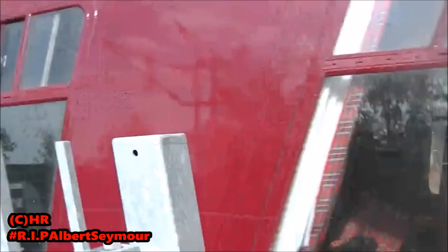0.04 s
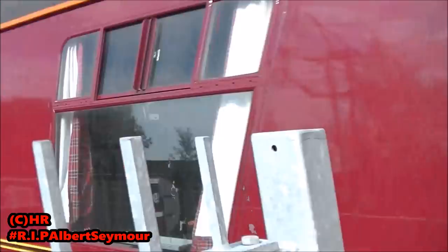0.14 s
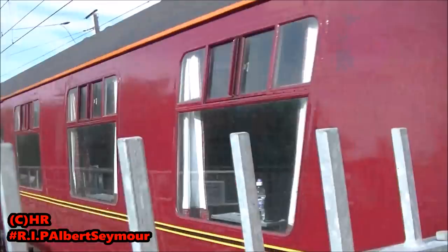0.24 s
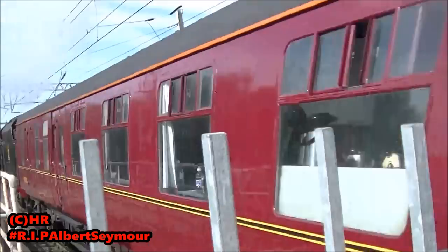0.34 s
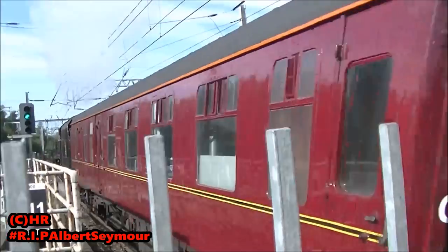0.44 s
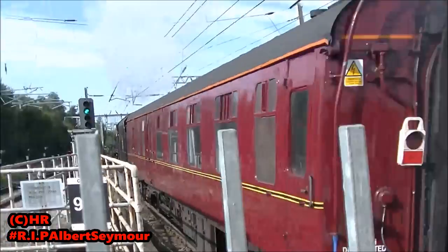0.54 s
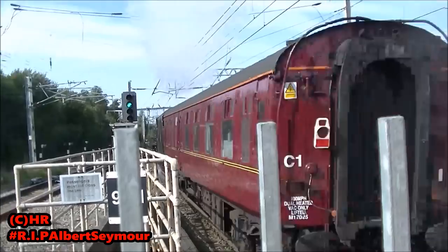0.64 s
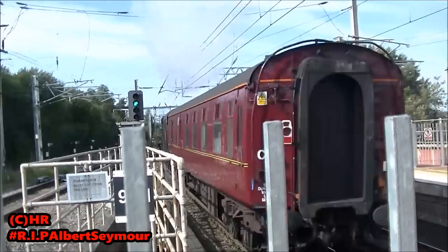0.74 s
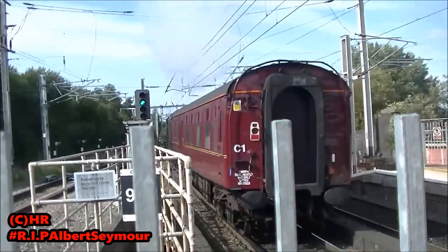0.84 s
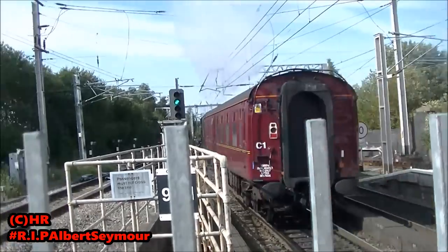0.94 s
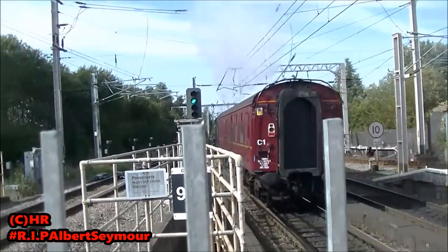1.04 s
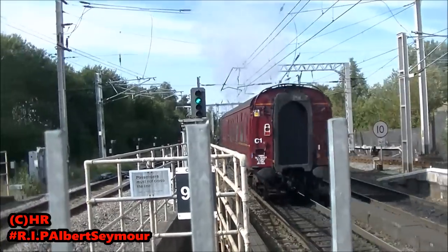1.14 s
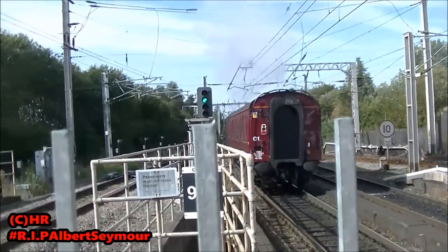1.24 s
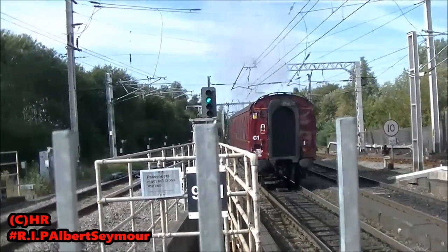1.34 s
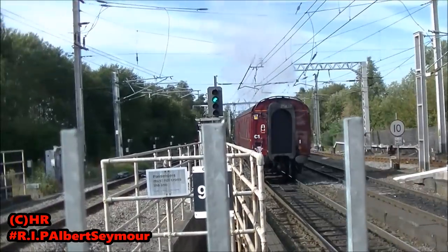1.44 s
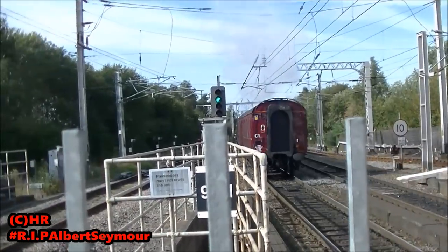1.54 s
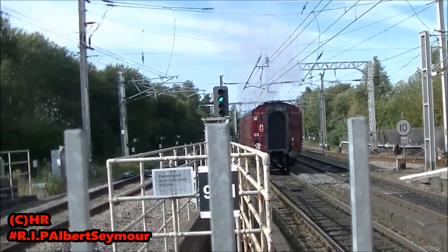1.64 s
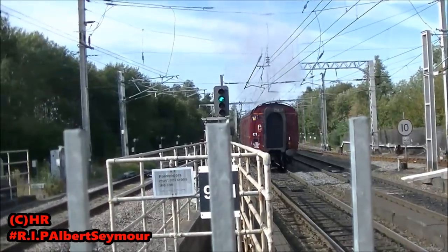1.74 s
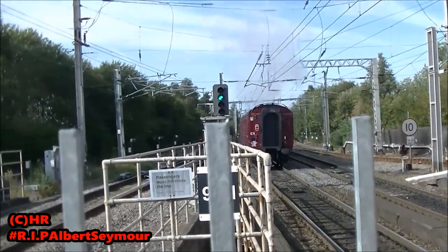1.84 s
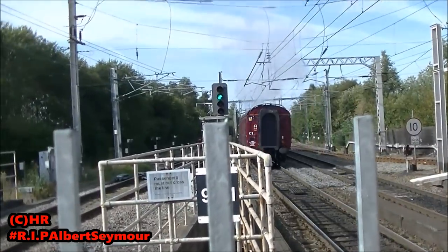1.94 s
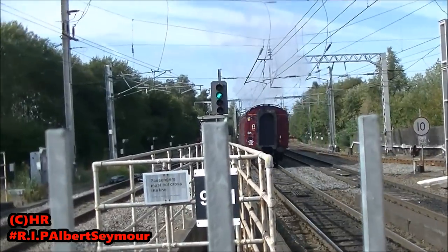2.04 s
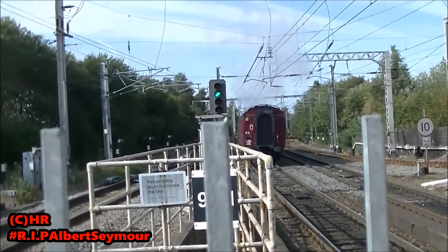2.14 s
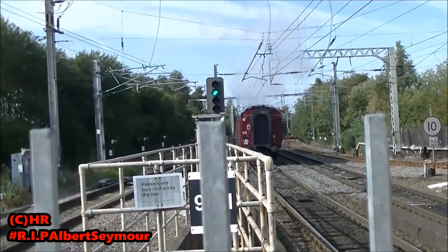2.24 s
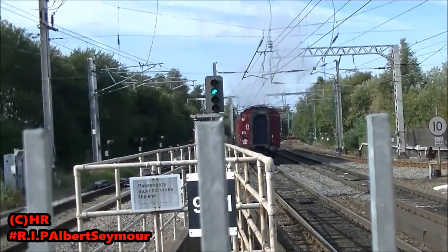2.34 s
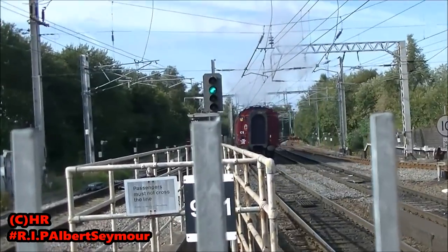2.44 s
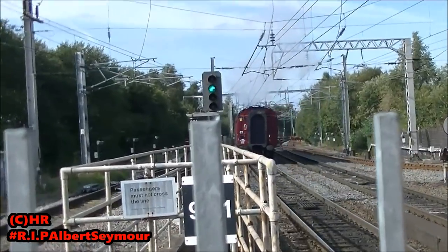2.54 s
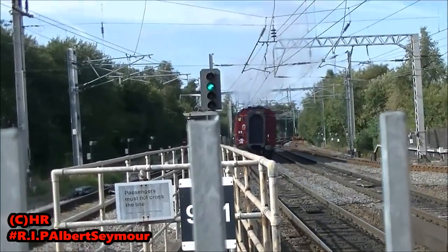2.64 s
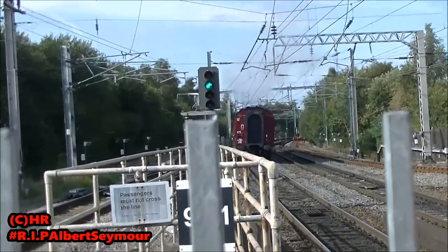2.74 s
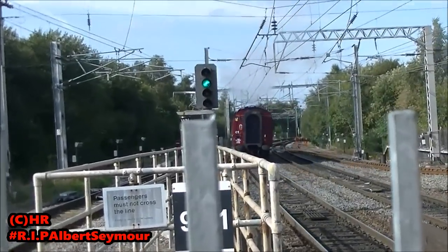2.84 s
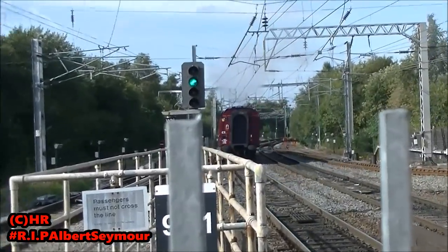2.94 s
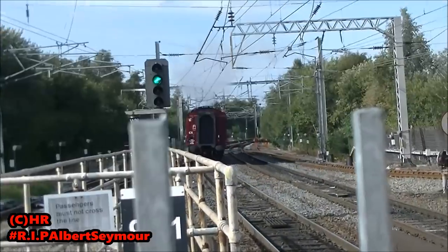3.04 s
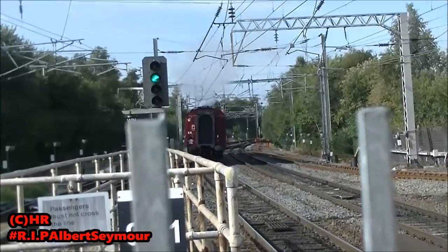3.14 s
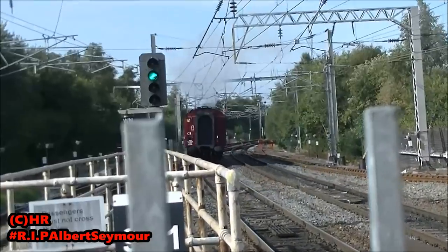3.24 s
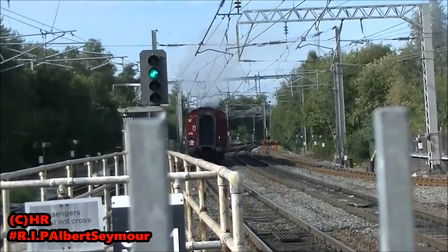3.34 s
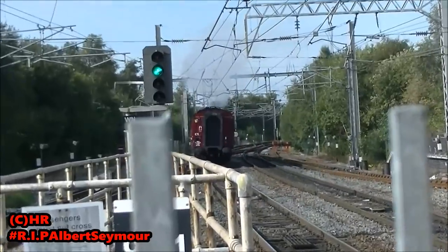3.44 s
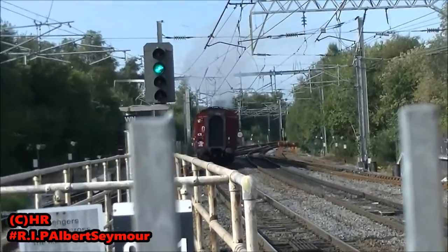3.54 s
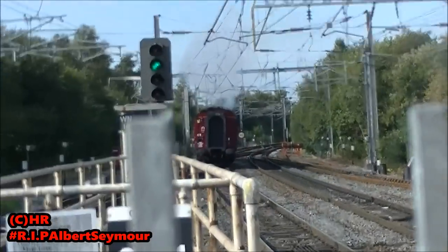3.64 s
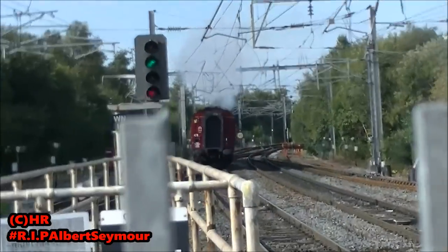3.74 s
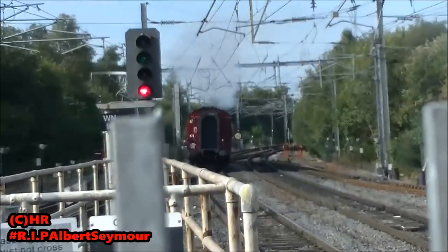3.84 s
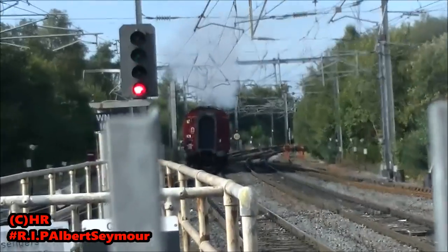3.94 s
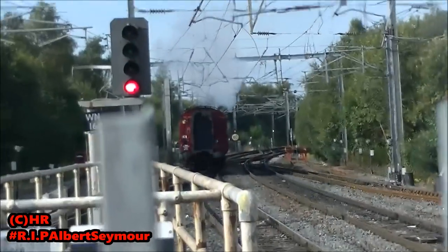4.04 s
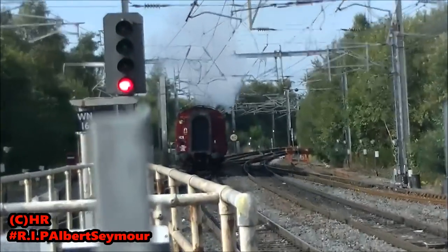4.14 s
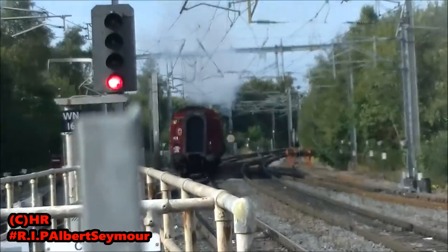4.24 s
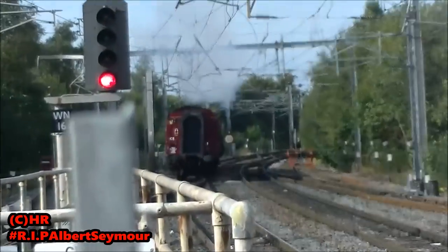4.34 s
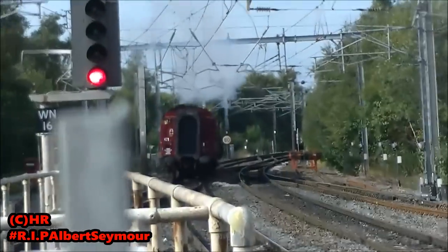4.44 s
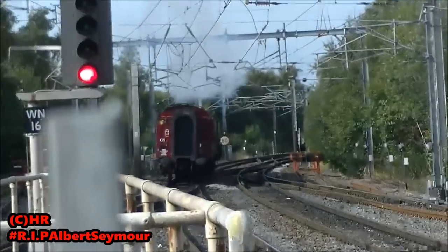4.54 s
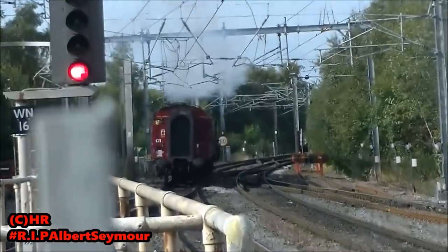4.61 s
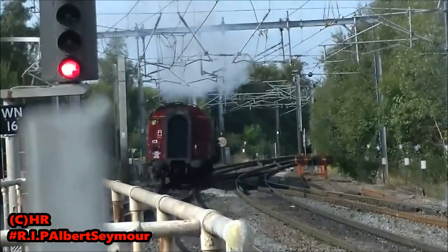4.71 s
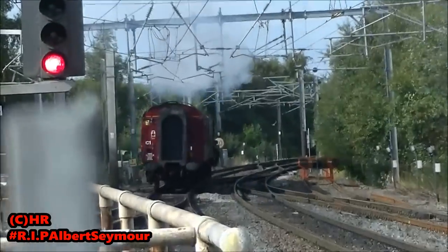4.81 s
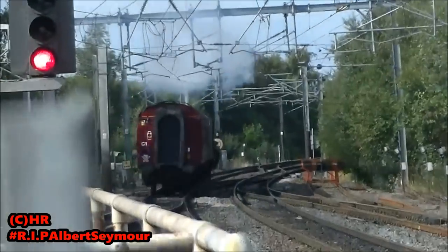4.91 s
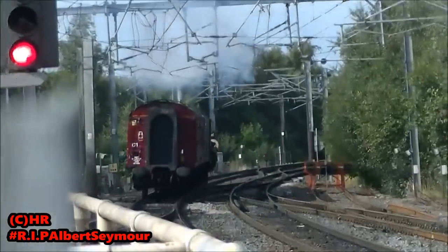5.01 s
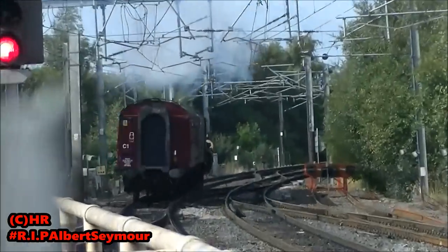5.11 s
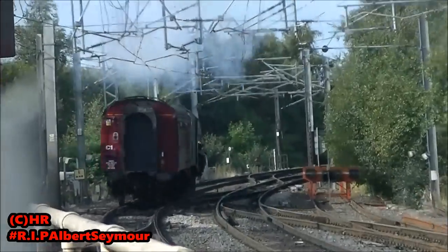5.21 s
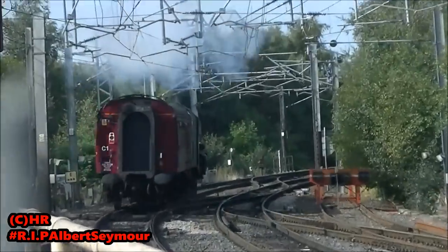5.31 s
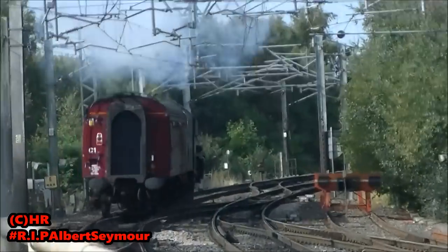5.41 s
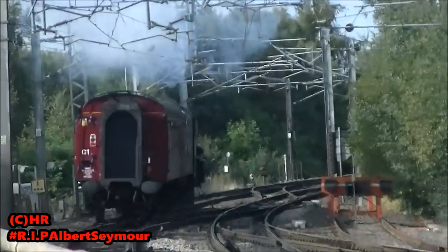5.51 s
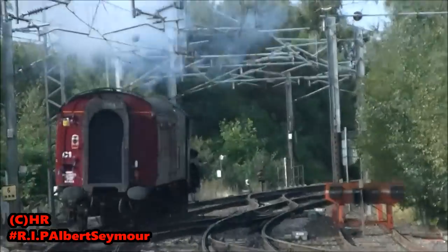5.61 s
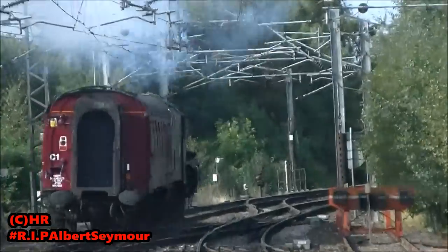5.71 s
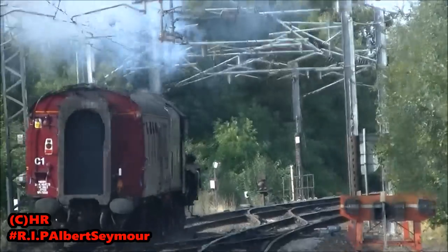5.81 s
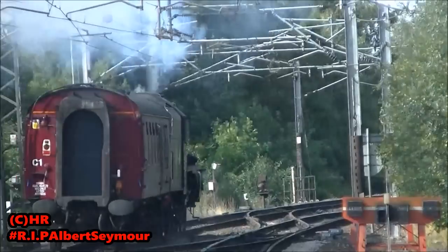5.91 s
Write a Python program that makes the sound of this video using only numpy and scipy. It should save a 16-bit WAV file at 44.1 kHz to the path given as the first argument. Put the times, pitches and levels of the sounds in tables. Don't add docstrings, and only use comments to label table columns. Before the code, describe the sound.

Last carriages of a train rush past close by and recede, wheels clacking over joints, with handling clicks and a thin late squeal.

```python
import sys
import numpy as np
from scipy import signal
from scipy.fft import rfft, irfft
from scipy.io import wavfile
from scipy.ndimage import uniform_filter1d

SR = 44100
rng = np.random.default_rng(int(sys.argv[2]) if len(sys.argv) > 2 else 0)


def log_audio(samples):
    frames = np.atleast_2d(samples).T
    limited = np.clip(frames, -1, 1)
    pcm = np.round(limited * 32767).astype(np.int16)
    wavfile.write(sys.argv[1], SR, pcm)


def makeup_ratio(level_db):
    decades = np.asarray(level_db, float) / 20
    return 10 ** decades


N = 263277

# (low [Hz], high [Hz])
LAYER_BANDS_HZ = [
    (250, 1500),
    (1500, 6000),
    (6000, 15000),
]
# (frequency [Hz], density [dB/Hz])
NEAR_COLOUR = [(250, -19), (330, -19), (450, -4.5), (595, -2.5), (770, -2.5), (1000, -3.5), (1170, -6),
               (1300, -2), (1580, -7), (1900, -5), (2100, -7.5), (2500, -3.5), (3200, -7.5), (4900, -9)]
# (frequency [Hz], density [dB/Hz])
FAR_COLOUR = [(250, -13), (450, -12), (600, -1.5), (710, -0.5), (870, -7.5), (1100, -8.5), (1300, -9),
              (1480, -13), (1750, -8.5), (2400, -12), (2800, -11.5), (3120, -17.5), (3500, -12),
              (4300, -14)]
# (time [s], far share [0-1])
FAR_SHARE = [(0, 0.35), (1.2, 0), (2, 0.57), (3, 0.72), (4, 0.97), (5.97, 0.84)]
# (time [s], level [dB])
TRAIN_LOUDNESS = [(0, -19.5), (.1, -19), (.5, -19), (.95, -18.5), (1.3, -20.5), (1.47, -20), (1.68, -23),
                  (1.87, -25), (2.4, -26.5), (2.9, -28.5), (3.2, -30), (3.4, -30.5), (3.8, -32),
                  (4.25, -33.5), (4.75, -33), (5.3, -33.5), (5.97, -30.5)]
# (level at loudest [dB], slope [dB/dB])
LAYER_LEVELS = [
    (-19, 1.0224),
    (-21.5, 0.8249),
    (-38.5, 1.32),
]
# (time [s], half length [s], rail [dB], wheel [dB], hiss [dB])
BOGIE_LIFTS = [(0.086, 0.092, 0.5, 0, 2.5), (0.25, 0.023, 0.5, -2, 0), (0.36, 0.27, -0.5, 3.5, 3),
               (.7, 0.17, 0.7, -1.1, -1), (1.252, 0.22, 0.4, 1, 1), (1.455, 0.039, -1.5, -2, -3.5),
               (1.52, 0.085, -0.3, -0.5, 0), (1.79, 0.049, 1.5, 1, 1), (2.1, 0.98, -0.4, 2, 2.5),
               (3.246, 0.19, 2, -0.8, -0.5), (3.618, 0.044, 1, 0.5, 1.5)]
# (frequency [Hz], gain [dB])
GRILLE_RESPONSE = [(100, -20), (160, -18), (230, 1), (300, 3), (5000, 1), (5700, -6.5), (6400, -7.5),
                   (7500, -14.5), (8600, -19.5), (9800, -14.5), (10600, -17.5), (12000, -27.5),
                   (13000, -32), (16000, -49)]
# (frequency [Hz], correlation [0-1])
PORT_LIKENESS = [(60, .5), (130, 0.55), (290, 0.79), (640, 1), (1400, 0.88), (3100, 0.96), (6800, 0.94),
                 (15000, 0.92)]
# (frequency [Hz], left minus right [dB])
PORT_LEAN_DB = [(130, -2.5), (290, -5), (640, -3.5), (1400, -2), (3100, -.5), (6800, 0.5), (15000, -.3)]
# (frequency [Hz], left lead [rad])
PORT_LEAD_RAD = [(200, 0.58), (1500, 0.31), (2700, 0.17), (3200, 0.48), (5600, 0.046), (6400, .01)]
# (time [s], factor on the lean)
CAMERA_SWING = [(0, 1.5), (.3, 1.23), (2, 1.23), (4, 1.28), (5.97, 0.51)]
# (time [s], length [s], frequency [Hz], slide [Hz/s], level [dB])
WHEEL_HUMS = [(.12, .1, 1430, -300, -25), (.24, .09, 1400, -250, -25), (.33, .17, 1335, -300, -21),
              (.78, .12, 1330, -500, -26), (1.15, .7, 1300, -15, -35), (.6, .22, 625, -200, -22),
              (.93, .12, 598, 10, -27), (1.2, .16, 600, -500, -25), (0, .14, 975, -300, -25),
              (1.38, .14, 600, -50, -26), (.29, .12, 2595, -640, -28), (5.22, .1, 1690, 20, -35),
              (4.42, .1, 1750, 10, -36), (0, .11, 1930, -300, -31), (.92, .07, 1400, 300, -27),
              (.22, .05, 700, -200, -26), (.45, .09, 720, -300, -25), (1.27, .06, 700, 200, -26),
              (2.58, .09, 560, 2500, -32), (2.762, .025, 700, 0, -23), (2.8, .08, 740, -500, -31),
              (3.17, .09, 780, -1400, -30)]
# (frequency [Hz], level [dB])
WIND_SPECTRUM = [(15, -50), (40, -34), (80, -16), (110, -9), (160, 1.5), (300, 6), (500, 5), (900, -18),
                 (8000, -25)]
# (time [s], peak [dB], rise [s], fall [s])
WIND_GUSTS = [(0, -40, .02, .05), (.28, -52, .08, .08), (.49, -34, .015, .11), (.68, -50, .05, .05),
              (1.35, -42, .06, .04), (1.57, -52, .03, .03), (1.83, -54, .05, .05), (2.05, -45, .04, .07),
              (2.33, -54, .05, .05), (2.6, -56, .1, .1), (2.88, -58, .05, .05), (3.2, -56, .03, .04)]
# (time [s], level [dB], length [s])
CASING_THUMPS = [
    (5.8363, -47, 0.0011),
    (3.5812, -61, .001),
    (.001, -44, .003),
    (2.907, -57, .001),
]
# (time [s], peak [dB], ring [Hz], second ring [Hz], length [s])
CASING_TICKS = [(.478, -30, 13500, 12000, .001), (.4865, -24, 12500, 10500, .0012),
                (.5362, -10, 8600, 10300, 0.0016), (1.313, -20, 9500, 12000, .001),
                (1.822, -16, 9800, 12500, .001), (2.077, -34, 15200, 14000, .001),
                (3.5813, -16, 9500, 7600, .0008), (3.637, -37, 12000, 14000, 0.0012),
                (3.562, -36, 10500, 9000, .002), (3.592, -39, 10500, 15000, .001),
                (5.677, -39, 10000, 8500, .001), (5.802, -40, 10500, 12000, .003),
                (5.881, -42, 13500, 12000, .001), (5.8338, -30, 4000, 3000, 0.0015),
                (5.8530, -15, 10000, 5300, .0016), (5.8885, -26, 9500, 1900, .0013),
                (5.9657, -17, 6000, 2600, 0.003)]
# (time [s], peak [dB], ring [Hz], second ring [Hz], length [s])
HARD_SNAPS = [
    (2.9071, 1, 6400, 4300, .00085),
    (2.9075, -7, 9400, 3100, .0007),
    (2.9081, -7, 4700, 5600, .0011),
    (5.8364, 1, 5600, 4700, .0006),
    (5.8375, -8, 4200, 2500, .001),
]
# (frequency [Hz], level [dB])
SNAP_SPECTRUM = [(1000, -46), (2500, -7.5), (4500, -11), (6500, -14), (10000, -10.5), (13000, -31),
                 (16000, -35)]
# (time [s], peak [dB])
JOINT_CLACKS = [(0.949, -5.5), (1.2076, -17), (1.491, -6.5), (1.7552, -6), (2.0347, -5.5), (2.3033, -6),
                (2.5705, -9), (2.8444, -25), (3.111, -14.5), (3.56, -15.5), (3.662, -19), (3.9404, -22),
                (4.2894, -22), (4.561, -18), (5.016, -15), (5.285, -17)]
# (frequency [Hz], level [dB])
CLACK_SPECTRUM = [(500, -38), (1500, -6), (2500, 5.5), (3300, -9), (4300, 4), (5200, 4.5), (7000, -21),
                  (12000, -35), (16000, -60)]
# (time [s], length [s], frequency [Hz], width [Hz], level [dB])
FINGER_BRUSHES = [
    (1.555, .06, 10500, 4000, -40),
    (1.342, .012, 12500, 6000, -49),
    (2.17, .015, 12500, 3000, -58),
    (3.2, .03, 11500, 2000, -61),
]
# (time [s], length [s], frequency [Hz], level [dB])
FLANGE_SQUEALS = [(4.655, .09, 4895, -37), (4.735, .19, 4893, -38.5), (4.93, .14, 4896, -40),
                  (5.115, .095, 4895, -39), (5.21, .13, 4893, -38), (5.33, .14, 4880, -41.5),
                  (5.46, .18, 4882, -38), (5.635, .05, 4885, -34.5), (5.725, .08, 4892, -37),
                  (5.84, .13, 4875, -42), (4.645, .13, 5258, -43), (4.76, .14, 5263, -43),
                  (4.92, .17, 5266, -41), (5.07, .15, 5262, -42), (5.25, .13, 5264, -43),
                  (5.39, .09, 5264, -49), (5.52, .11, 5275, -50), (4.87, .22, 4785, -45),
                  (5.675, .15, 4757, -39), (5.85, .12, 4755, -36.5)]
# (time [s], length [s], frequency [Hz], slide [Hz/s], level [dB])
SQUEAL_CHIRP = [
    (4.405, .1, 6575, 600, -53),
    (4.48, .14, 6640, 150, -51.5),
    (4.6, .07, 6660, -100, -62),
]
# (time [s], length [s], frequency [Hz], slide [Hz/s], level [dB])
MODE_SINGING = [
    (4.62, 1.35, 4897, -12, -48.5),
    (4.62, .85, 5260, 8, -52),
    (5.66, .31, 4770, -60, -49),
]
# (time [s], gain [dB])
HISS_LIFT = [(0, 0), (4.2, .5), (5.97, 4)]
# (time [s], depth [dB], onset [s], recovery [s])
GAIN_DUCKS = [
    (.48, 4, 0.023, 0.05),
    (1.35, 6, 0.0068, 0.03),
    (1.825, 1, 0.014, 0.11),
    (2.908, 4.5, 0.00069, 0.04),
    (5.838, 1, .002, 0.028),
]

LOUDEST_DB = -19
RUMBLE_DB, SELF_NOISE_DB = -61, -73.5
CALM_DB, CALM_DB_PER_S = -57, -4.5
CLACK_T60_S = 0.095
SECOND_DB, SECOND_DB_PER_OCTAVE = -12.5, -10


def evened(x):
    return x / np.sqrt(np.mean(x ** 2) + 1e-20)


def read(points, hz):
    f, value = np.transpose(points)
    return np.interp(np.log(hz + 1), np.log(f + 1), value)


def follow(rows, t):
    s, value = np.transpose(rows)
    return np.interp(t, s, value)


def add(mix, s, sound):
    part = mix[..., round(s * SR):][..., :sound.shape[-1]]
    part += sound[..., :part.shape[-1]]


def resonate(x, hz, width_hz):
    turn = np.exp(2j * np.pi * np.cumsum(hz * np.ones(len(x))) / SR)
    r = np.exp(-np.pi * width_hz / SR)
    return 2 * (turn * signal.lfilter([1 - r], [1, -r], x / turn)).real


def resonate_twice(x, hz, width_hz):
    return resonate(resonate(x, hz, width_hz), hz, width_hz)


def coloured(points, size):
    spectrum = rfft(rng.standard_normal(size))
    return evened(irfft(spectrum * makeup_ratio(read(points, np.fft.rfftfreq(size, 1 / SR))), size))


def drift(shape, bins, frames):
    field = uniform_filter1d(rng.standard_normal(shape), size=bins, axis=0)
    return evened(uniform_filter1d(field, size=frames, axis=1))


def tones(rows, width_hz, clean, edges):
    out = np.zeros((2, N))
    for s, length_s, start_hz, slide, db in rows:
        noise = rng.standard_normal((2, SR))[:, :round(length_s * SR)]
        hz = start_hz + slide * np.arange(noise.shape[1]) / SR
        fuzz = np.array([evened(resonate_twice(n, hz, width_hz)) for n in noise])
        quadrature = np.array([[0], [np.pi / 2]])
        steady = np.sqrt(2) * np.sin(2 * np.pi * np.cumsum(hz) / SR + quadrature)
        sound = np.sqrt(clean) * steady + np.sqrt(1 - clean) * fuzz
        add(out, s, sound * makeup_ratio(db) * signal.windows.tukey(len(hz), edges))
    return out


def layers_db(t):
    fall_db = follow(TRAIN_LOUDNESS, t) - LOUDEST_DB
    level_db = np.array([db + slope * fall_db for db, slope in LAYER_LEVELS])
    for s, half_s, *lift_db in BOGIE_LIFTS:
        level_db += np.exp(-((t - s) / half_s) ** 2) * np.array(lift_db)[:, None]
    return level_db


def rolling(patchy_db=0.75, flicker_db=0.81, ringing_db=1.39):
    hz, t, z = signal.stft(rng.standard_normal((2, N)), SR, nperseg=1024, noverlap=768)
    far = follow(FAR_SHARE, t)
    colour_db = (1 - far) * read(NEAR_COLOUR, hz)[:, None] + far * read(FAR_COLOUR, hz)[:, None]
    colour = makeup_ratio(colour_db + read(GRILLE_RESPONSE, hz)[:, None])
    patches = drift(colour.shape, bins=10, frames=12)
    rings = drift(colour.shape, bins=2, frames=24)
    flicker = evened(uniform_filter1d(rng.standard_normal(len(t)), size=6))
    place = np.interp(np.log(hz + 1), np.log([1200, 1900, 5200, 7200]), [0, 1, 1, 2])[:, None]
    gain_db = 0
    for k, (db, (low_hz, high_hz)) in enumerate(zip(layers_db(t), LAYER_BANDS_HZ)):
        band = colour[(hz > low_hz) & (hz < high_hz)]
        band_db = 10 * np.log10((band ** 2).sum(0) / len(hz))
        gain_db = gain_db + np.maximum(1 - abs(place - k), 0) * (db - band_db)
    rough_db = patchy_db * patches + ringing_db * rings + flicker_db * flicker * np.minimum(place, 1)
    z = z * colour * makeup_ratio(gain_db + rough_db)
    return signal.istft(z, SR, nperseg=1024, noverlap=768)[1][:, :N]


def hums():
    return makeup_ratio(-1.5) * tones(WHEEL_HUMS, width_hz=40, clean=.75, edges=.8)


def rumble():
    level_db = RUMBLE_DB + 0.82 * follow(TRAIN_LOUDNESS, np.arange(N) / SR)
    return makeup_ratio(level_db) * coloured([(10, 0), (90, -1), (200, -20), (400, -60)], size=N)


def self_noise():
    colour = [(3000, -30), (8000, -4), (12000, 0.5), (15500, 5), (16500, -20)]
    return makeup_ratio(SELF_NOISE_DB + follow(HISS_LIFT, np.arange(N) / SR)) * coloured(colour, size=N)


def wind(lumpy_db=-2.0, shared=0.27):
    t = np.arange(N) / SR
    lumps = np.array([evened(uniform_filter1d(n, size=1500)) for n in rng.standard_normal((2, N))])
    air = np.array([coloured(WIND_SPECTRUM, size=N), coloured(WIND_SPECTRUM, size=N)])
    blow = makeup_ratio(CALM_DB + CALM_DB_PER_S * t)
    for s, db, rise_s, fall_s in WIND_GUSTS:
        blow += makeup_ratio(db) * np.exp(-((t - s) / np.where(t < s, rise_s, fall_s)) ** 2)
    port_db = lumpy_db * (.8 * lumps[0] + 0.48 * lumps) + [[-.3], [.3]]
    return (air + shared * air[::-1]) * blow * makeup_ratio(port_db)


def thumps():
    out, t = np.zeros(N), np.arange(800) / SR
    for s, db, length_s in CASING_THUMPS:
        add(out, s, makeup_ratio(db) * np.e * (t / length_s) * np.exp(-t / length_s))
    return out


def ticks(snap_db=-10, side_db=-17, edge_db=-13):
    out, t = np.zeros((2, N)), np.arange(800) / SR
    for s, db, hz, second_hz, length_s in HARD_SNAPS + CASING_TICKS:
        light_db = min(db, 0)
        second_db = SECOND_DB + SECOND_DB_PER_OCTAVE * np.log2(second_hz / hz)
        fade = (1 - np.exp(-t / 0.000091)) * (np.exp(-(t / length_s) ** 2) + 0.05 * np.exp(-t / 0.003))
        crack, other = coloured(SNAP_SPECTRUM, size=len(t)), coloured(SNAP_SPECTRUM, size=len(t))
        wide = evened(resonate(crack, hz, .6 * hz - 500 * light_db))
        early = (makeup_ratio(light_db) * np.sin(2 * np.pi * hz * t) + makeup_ratio(snap_db) * wide) * fade
        swell = (t / length_s) * np.exp(-(t / (1.15 * length_s)) ** 2)
        late = swell * np.sin(2 * np.pi * second_hz * t)
        edge = np.exp(-t / .00013) * np.sin(2 * np.pi * 12500 * t)
        sound = early / abs(early).max() + makeup_ratio(second_db) * late + makeup_ratio(edge_db - .2 * light_db) * edge
        side = makeup_ratio(side_db) * evened(resonate(other, 5500, 5000)) * fade
        add(out, s, makeup_ratio(db) * np.array([sound + side, sound - side]))
    return signal.sosfilt(signal.butter(2, 15800, fs=SR, output="sos"), out)


def clacks(trim_db=-9, rise_s=0.0046):
    out, t = np.zeros((2, N)), np.arange(SR // 5) / SR
    for s, db in JOINT_CLACKS:
        far = follow(FAR_SHARE, s)
        burst = []
        for _ in range(2):
            wide = coloured(CLACK_SPECTRUM, size=len(t))
            ring = resonate(resonate(wide, 3660, 1500), 3800, 1500)
            burst.append(evened((1 - far) * wide + 1.8 * far * ring))
        decay = makeup_ratio(db + trim_db - 60 * t / CLACK_T60_S)
        add(out, s, np.array(burst) * decay * (1 - np.exp(-t / rise_s)))
    return out


def brushes():
    out = np.zeros(N)
    for s, length_s, hz, width_hz, db in FINGER_BRUSHES:
        noise = rng.standard_normal(6000)[:round(length_s * SR)]
        add(out, s, makeup_ratio(db) * evened(resonate_twice(noise, hz, width_hz)) * np.hanning(len(noise)))
    return out


def squeal(beads_db=1.5):
    spells = [(s, length_s, hz, 0, db) for s, length_s, hz, db in FLANGE_SQUEALS]
    steady = tones(spells, width_hz=45, clean=.8, edges=.45)
    beads = evened(uniform_filter1d(uniform_filter1d(rng.standard_normal(N), size=500), size=500))
    singing = tones(MODE_SINGING, width_hz=70, clean=.1, edges=.1)
    chirp = tones(SQUEAL_CHIRP, width_hz=90, clean=.85, edges=.5)
    return makeup_ratio(beads_db * np.tanh(beads)) * steady + singing + chirp


def ports(x):
    hz, t, (left, other) = signal.stft(x, SR, nperseg=1024, noverlap=768)
    same = read(PORT_LIKENESS, hz)[:, None]
    lean_db = read(PORT_LEAN_DB, hz)[:, None] * follow(CAMERA_SWING, t)
    lean = makeup_ratio(lean_db / 2) * np.exp(.5j * read(PORT_LEAD_RAD, hz))[:, None]
    right = same * left + np.sqrt(1 - same ** 2) * other
    pair = np.array([left * lean, right / lean])
    return signal.istft(pair, SR, nperseg=1024, noverlap=768)[1][:, :N]


def scene():
    wheel_hums = hums()
    train = rolling() + wheel_hums + clacks() + squeal()
    bass_cut = signal.butter(4, 150, "high", fs=SR, output="sos")
    floor = rumble() + self_noise()
    touch = wind() + brushes() + thumps()
    return signal.sosfilt(bass_cut, ports(train) + ticks()) + touch + floor


def top_cut(x):
    return signal.sosfilt(signal.butter(12, 15900, fs=SR, output="sos"), x)


def record(dry):
    t, duck_db = np.arange(N) / SR, 0
    for s, db, onset_s, recovery_s in GAIN_DUCKS:
        after = np.maximum(t - s - .003, 0)
        recovery = np.exp(-np.maximum(after - onset_s, 0) / recovery_s)
        duck_db = duck_db + db * (1 - np.exp(-(after / onset_s) ** 2)) * recovery
    return top_cut(np.clip(dry / makeup_ratio(duck_db), -1, 1))


dry = scene()
out = record(dry)
log_audio(out)
```